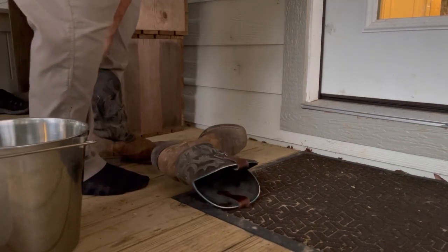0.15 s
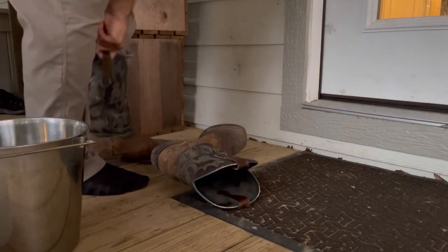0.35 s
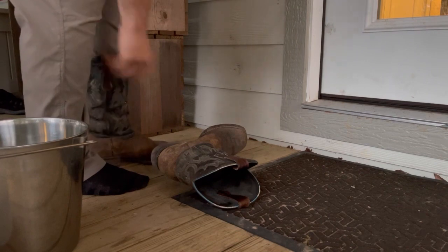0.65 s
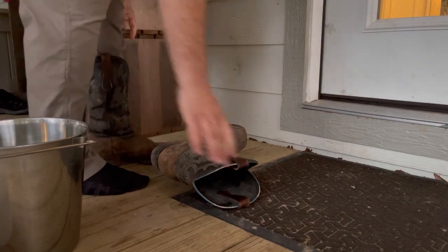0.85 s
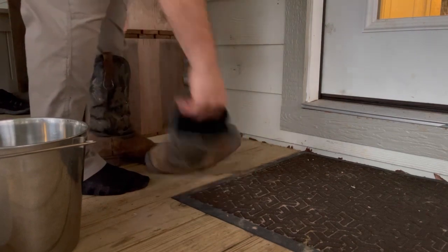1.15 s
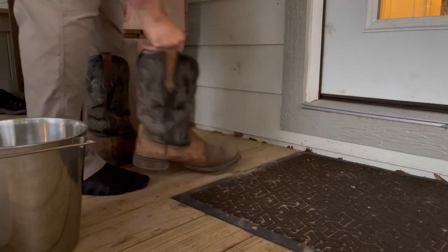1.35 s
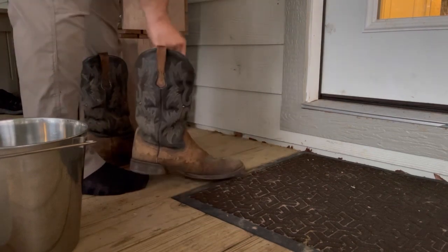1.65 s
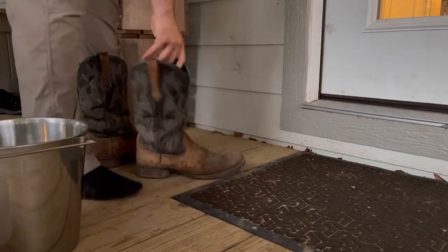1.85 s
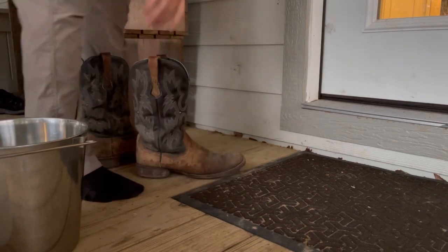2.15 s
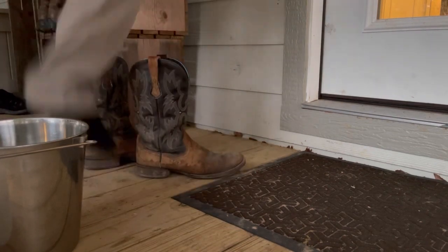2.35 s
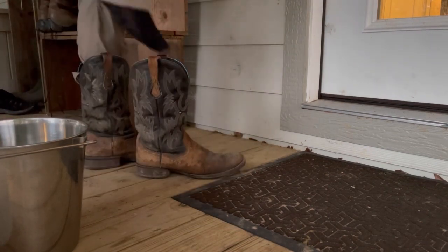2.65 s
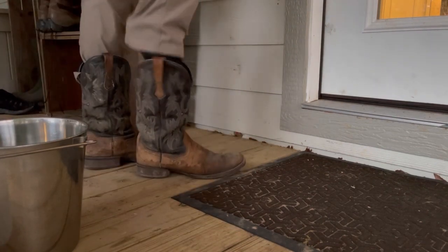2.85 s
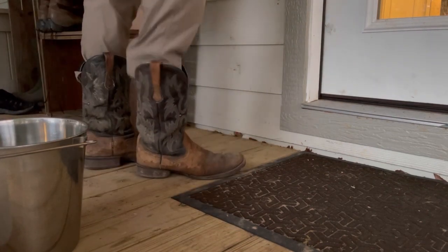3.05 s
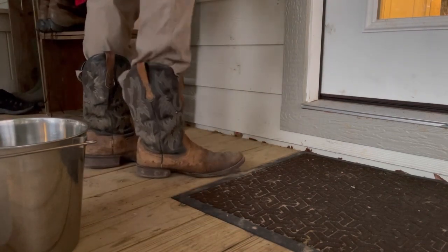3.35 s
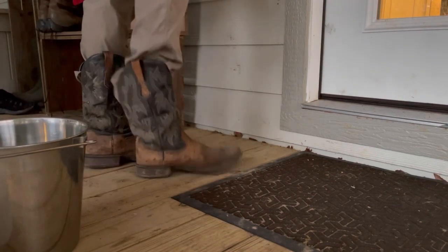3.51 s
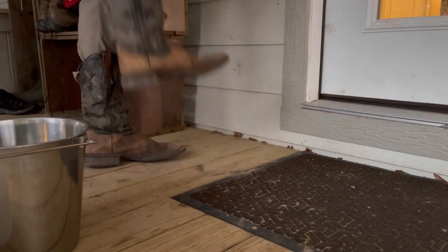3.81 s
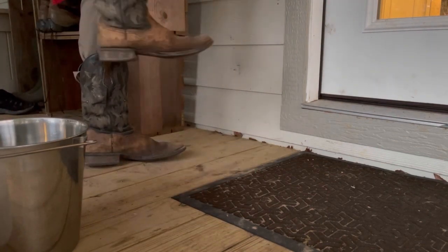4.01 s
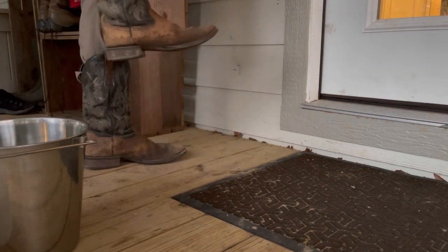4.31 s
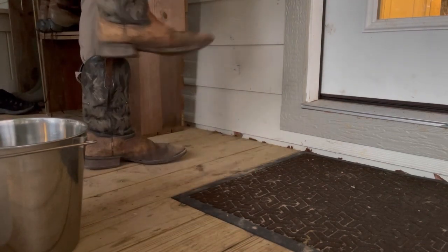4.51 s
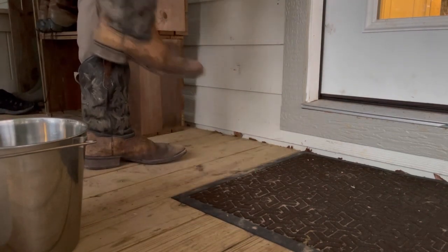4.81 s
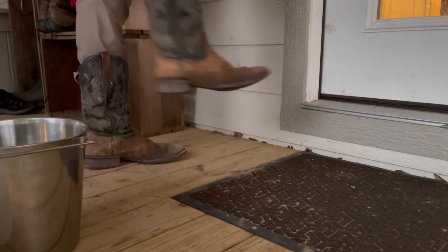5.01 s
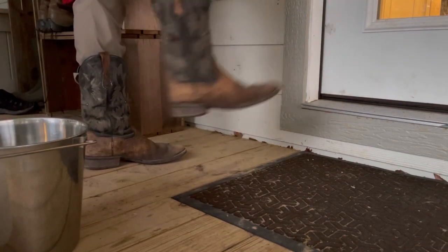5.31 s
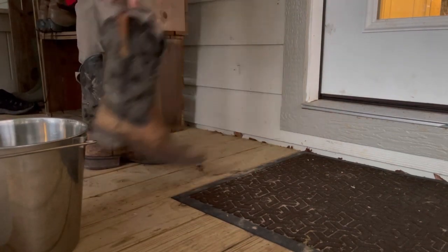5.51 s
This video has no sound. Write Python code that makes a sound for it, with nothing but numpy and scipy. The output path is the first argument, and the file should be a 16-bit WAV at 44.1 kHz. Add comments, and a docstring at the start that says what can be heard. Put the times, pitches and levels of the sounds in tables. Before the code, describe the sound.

Leather boots are pulled on over a wooden porch deck: cloth and leather rub, heels knock hollowly, ending with a whump and a stomp.

```python
"""Two leather boots are pulled on, on a wooden porch deck: sock and trouser leg rub through the hollow shafts.
The rubbing is coloured noise that swells stroke by stroke, with small leather slips and gliding hollow notes.
Heels knock on the boards and set them ringing, and the deck quivers; the second heel slides home with a whump.
Small scuffs, taps, bumps, pops and a squeak are short bursts of noise or fading tones.
A far bird calls three times and a faint whine comes and goes, over quiet outdoor air made of noise."""
import sys
import numpy as np
from scipy import signal
from scipy.io import wavfile
from scipy.ndimage import map_coordinates

SR = 44100
rng = np.random.default_rng(int(sys.argv[2]) if len(sys.argv) > 2 else 0)


def store_pcm(level_fs):
    """Save levels as 16-bit WAV."""
    pcm = np.round(np.clip(level_fs, -1, 1) * 32767).astype(np.int16)
    wavfile.write(sys.argv[1], SR, np.atleast_2d(pcm).T)


N = 249826
T = np.arange(N) / SR


def from_db(db):
    """Turn decibels into a gain."""
    return 10 ** (np.asarray(db) / 20)


def rms_one(x):
    """Scale a sound to an average strength (rms) of 1."""
    return x / np.sqrt(np.mean(x ** 2) + 1e-20)


def at_hz(points, hz, column=1):
    """Read one column of a table at a frequency, with frequency on a log scale."""
    points = np.array(points)
    return np.interp(np.log(hz), np.log(points[:, 0]), points[:, column])


def drift(rate_hz):
    """Smooth random wandering with an rms of 1; a higher rate wanders faster."""
    step = 40   # compute one point per 40 samples, then join them with straight lines
    r = np.exp(-2 * np.pi * rate_hz * step / SR)
    steps = rng.standard_normal(N // step + 2002)
    slow = signal.lfilter([1], [1, -2 * r, r * r], steps)[2000:]   # skip the filter's start-up
    return np.interp(np.arange(N) / step, np.arange(len(slow)), rms_one(slow))


def catching(rate_hz, depth_db):
    """An uneven gain, as when friction catches and lets go; rms 1."""
    return rms_one(from_db(depth_db * drift(rate_hz)))


def low_pass(x, hz, order=2):
    """Take away the treble above a frequency (Butterworth filter)."""
    return signal.sosfilt(signal.butter(order, hz, fs=SR, output="sos"), x + 1e-18)


def band_pass(x, low_hz, high_hz, order=2):
    """Keep only what lies between two frequencies (Butterworth filter)."""
    return signal.sosfilt(signal.butter(order, [low_hz, high_hz], "band", fs=SR, output="sos"), x)


def add(out, start_s, sound):
    """Mix a sound in from a given time on."""
    start = round(start_s * SR)
    out[..., start:start + sound.shape[-1]] += sound[..., :N - start]


def dying(t, t60_s):
    """Exponential fade that loses 60 dB in t60_s seconds."""
    return np.exp(-np.log(1000) * t / t60_s)


def ringing(modes, t, spread, scatter=1):
    """A struck body: a sum of fading tones, each with its own phase that differs between left and right."""
    sides = spread * np.array([[1], [-1]])
    out = 0
    for k, (hz, db, t60_s) in enumerate(modes):
        phase = scatter * k + sides * (-1) ** k * min(hz / 700, 1)
        out = out + from_db(db) * np.sin(2 * np.pi * hz * t + phase) * dying(t, t60_s)
    return out


# how alike left and right are: pitch_hz, likeness (1 = identical)
LIKENESS = [(60, 0.98), (250, 0.87), (500, 0.8), (1000, 0.62), (2000, .53), (4000, 0.42), (8000, 0.15),
            (13000, 0.2)]


def noise_bands(size):
    """Half-octave bands of stereo noise, as (Hz, band); the two sides are less alike in the treble."""
    edges_hz = 22 * 2 ** np.arange(0, 9.6, .5)
    white = rng.standard_normal((2, 2, size))
    for k, (low, high) in enumerate(zip(edges_hz, edges_hz[1:])):
        mid, side = band_pass(white[k % 2], low, high)
        hz = np.sqrt(low * high)
        alike = at_hz(LIKENESS, hz)
        yield hz, np.sqrt(1 + alike) * mid + np.sqrt(1 - alike) * side * [[1], [-1]]


def coloured(spectrum, patchy_db):
    """Stereo noise shaped to a spectrum, steeply falling beyond its ends; each band flickers; rms 1."""
    out, flicker = 0, from_db(patchy_db) - 1
    for hz, band in noise_bands(N):
        octaves_out = max(np.log2(spectrum[0][0] / hz), np.log2(hz / spectrum[-1][0]), 0)
        if octaves_out < 2:
            level = from_db(at_hz(spectrum, hz) - 22 * octaves_out)
            out = out + band * level * np.maximum(1 + flicker * drift(16), 0)
    return rms_one(out)


# air resonances inside a boot: pitch_hz, width_hz, level_db
CAVITY = [(314.4, 17, -2), (433.4, 13, 9), (543.5, 13, 11.5), (725, 32, 3), (1050, 240, -4),
          (1470, 120, 3.5)]


def hollow(x, share):
    """Part of a sound passes through the resonances of the boot's cavity; rms 1."""
    inside = sum(from_db(db) * signal.lfilter(*signal.iirpeak(hz, hz / width_hz, fs=SR), x)
                 for hz, width_hz, db in CAVITY)
    return rms_one((1 - share) * x + share * inside)


def wander(x, depth):
    """The shaft flexes: the sound is read faster and slower, so its resonances drift by a share of their pitch."""
    position = np.cumsum(1 + depth * drift(4)) % (N - 1)
    return np.array([map_coordinates(side, [position], order=3, mode="nearest") for side in x])


def slips(per_s, spread_db):
    """Leather grain sticks and slips: tiny snaps of uneven size in the creased hide; rms 1."""
    sizes = from_db(spread_db * np.minimum(rng.exponential(1, N), 3)) * rng.choice([-1, 1], N)
    happens = rng.random(N) < per_s / SR
    snaps = sizes * happens * (1 + 0.85 * rng.standard_normal((2, N)))
    return rms_one(band_pass(snaps + 1e-18, 900, 3200, order=1))


# strokes of cloth on leather, from the first foot going in to the last leg coming down:
# start_s, length_s, swell_db (rise during the stroke; negative sinks), hiss_db, shaft_tone_db, rasp_db
STROKES = [(0.085, 0.12, 8, -59, -57, -68), (0.195, 0.092, 2, -54.5, -45, -53),
           (0.308, 0.14, 1, -55.5, -48, -51), (0.418, 0.03, 1, -59, -49, -57),
           (0.549, 0.043, 0, -60, -49, -81), (1.048, 0.14, 9.5, -63.5, -48, -60.5),
           (1.443, 0.084, 7, -67.5, -50.5, -61), (2.217, 0.13, 0, -65.5, -62, -64.5),
           (2.347, 0.21, -3, -65.5, -75, -77), (2.717, 0.22, -7.5, -68.5, -64, -81),
           (2.982, 0.22, 0.5, -66, -58.5, -62.5), (3.123, 0.036, -5, -61, -46.5, -53.5),
           (3.19, 0.12, 4, -60.5, -70, -63), (3.213, 0.13, 18.5, -54.5, -49, -54),
           (3.38, 0.16, 0, -68, -59, -71), (3.592, 0.2, 9.5, -59.5, -72, -66.5),
           (3.795, 0.24, -2, -64, -66.5, -64.5), (4.116, 0.12, -2, -64, -71, -69.5),
           (4.321, 0.24, 3, -66, -59.5, -58), (4.492, 0.22, 18.5, -58.5, -53, -54),
           (4.719, 0.14, 3, -54, -51.5, -53), (4.878, 0.25, 7.5, -55.5, -54.5, -53.5),
           (5.066, 0.11, 17.5, -48, -45, -46.5), (5.348, 0.11, 9, -57, -52.5, -56.5),
           (5.474, 0.084, -5, -63, -80, -76)]
# clothes stir between strokes: hiss_db, shaft_tone_db, rasp_db
RUSTLE = [-70.5, -73, -71.5]
STROKE_ATTACK_S, STROKE_RELEASE_T60_S = 0.027, 0.38


def stroke_gains():
    """Gains of hiss, shaft tone and rasp: each stroke sets in, swells under pressure and dies away."""
    power = from_db(RUSTLE)[:, None] ** 2 * np.ones(N)
    t = T[:SR]
    attack = 1 - np.exp(-(t / STROKE_ATTACK_S) ** 2)
    for start_s, length_s, swell_db, *levels_db in STROKES:
        swell = from_db(swell_db * (np.minimum(t / length_s, 1) - 1))
        release = dying(np.maximum(t - length_s, 0), STROKE_RELEASE_T60_S)
        add(power, start_s, (from_db(levels_db)[:, None] * attack * swell * release) ** 2)
    return np.sqrt(power)


# colour of the cloth hiss: pitch_hz, level_db (per Hz)
HISS = [(900, -1), (1800, 0.5), (3000, -1.5), (5000, -3), (7000, -6), (10500, -8.5), (13500, -10.5)]
# colour of the hollow shaft tone: pitch_hz, level_db (per Hz)
SHAFT = [(130, -2), (240, -1), (340, -2), (450, -5), (580, -9.5), (760, -10), (950, -25.5)]
# colour of the leather rasp: pitch_hz, level_db (per Hz)
RASP = [(600, -28.5), (800, 3), (1050, -3), (1350, 2), (1650, -8), (2100, -5.5)]
FLEX = .045   # drift of the shaft's resonances, as a share of their pitch


def rubbing():
    """Cloth hisses on leather, the leather rasps and slips, and the hollow shaft colours the rubbing."""
    hiss_gain, shaft_gain, rasp_gain = stroke_gains()
    hiss = hiss_gain * from_db(2.5) * coloured(HISS, patchy_db=0.5)
    shaft_tone = wander(hollow(coloured(SHAFT, patchy_db=1.5), share=0.44), FLEX)
    sock_drag = catching(rate_hz=55, depth_db=2.5)   # the sock drags unevenly
    shaft = shaft_gain * shaft_tone * sock_drag
    grain = from_db(-9) * slips(per_s=260, spread_db=4)   # creasing leather
    rasp_tone = wander(hollow(coloured(RASP, patchy_db=1.5), share=0.63), FLEX)
    rasp = rasp_gain * (rasp_tone + grain)
    return (hiss + shaft + rasp) * catching(rate_hz=13, depth_db=1.5)


# hollow notes drawn from the boot by rubbing: start_s, length_s, first_pitch_hz, last_pitch_hz, level_db
HOLLOW_NOTES = [(.22, 0.082, 698, 868, -53), (0.352, .125, 1230, 1520, -54),
                (1.187, 0.057, 1070, 1047, -52.5), (1.48, 0.092, 460, 475, -60),
                (3.121, 0.036, 1176, 1296, -54.5), (3.194, 0.14, 394, 570, -55.5),
                (3.498, 0.079, 515, 565, -60.5)]
NOTE_ROUGHNESS_HZ = 60   # how fast the friction varies; it widens the note


def hollow_notes():
    """Friction excites one narrow air resonance, which glides as the cavity changes."""
    out = np.zeros(N)
    friction = drift(NOTE_ROUGHNESS_HZ) + 1j * drift(NOTE_ROUGHNESS_HZ)
    friction = friction / np.sqrt(np.abs(friction) ** 2 + 1)   # pressure evens out the strong moments
    for start_s, length_s, first_hz, last_hz, db in HOLLOW_NOTES:
        along = np.clip((T - start_s) / length_s, 0, 1)
        phase = 2 * np.pi * np.cumsum(first_hz + (last_hz - first_hz) * along) / SR
        note = rms_one(np.real(friction * np.exp(1j * phase)))
        swell = np.sqrt(np.abs(np.sin(np.pi * along)))
        out += from_db(db) * swell * note
    return out


# cloth flicks across leather: middle_s, half_width_s, level_db
SWISHES = [(0.031, 0.032, -63.5), (1.714, 0.037, -59), (2.26, 0.018, -51.5), (2.739, 0.0045, -55.5),
           (3.532, 0.017, -62), (4.175, 0.03, -62), (4.27, 0.036, -65.5), (5.445, 0.014, -73)]
# colour of the flicks: pitch_hz, level_db (per Hz)
SWISH = [(1800, -1), (3200, -2), (6000, 0), (10500, -2.5), (13500, -5)]


def swishes():
    """Cloth flicks across leather: a thin hiss that swells and fades."""
    gain = sum(from_db(db) * np.exp(-((T - middle_s) / half_width_s) ** 2)
               for middle_s, half_width_s, db in SWISHES)
    return gain * coloured(SWISH, patchy_db=2.5)


# the creased shaft pops as it is tugged: start_s, level_db, damping_t60_s
POPS = [(4.549, -48, .15), (4.684, -42, .03), (4.688, -36, 1), (5.047, -37, .05)]
# ring of the shaft's wall: pitch_hz, level_db, t60_s
SHAFT_WALL = [(754, 0, .15), (885, -13, .03), (1055, -12, .05), (1384, -12, .045), (1720, -11, .03),
              (2900, -14, .015)]


def pops():
    """The stiff shaft buckles with a short, woody note."""
    out, t = np.zeros((2, N)), T[:SR // 4]
    note = ringing(SHAFT_WALL, t, spread=0.33)
    for start_s, db, damping_t60_s in POPS:
        add(out, start_s, from_db(db) * note * dying(t, damping_t60_s))
    return out


# short squeak of stretched leather: middle_s, pitch_hz, half_width_s, level_db
SQUEAKS = [(4.642, 1090, 0.021, -52)]


def squeak(middle_s, hz, half_width_s, db):
    """The stretched leather sticks and slips in one short, rough note with a weak octave."""
    phase = 2 * np.pi * np.cumsum(hz * (1 + .045 * drift(200))) / SR
    note = np.sin(phase) + from_db(-12) * np.sin(2 * phase)
    rough = note * catching(rate_hz=150, depth_db=4)
    return from_db(db) * np.exp(-((T - middle_s) / half_width_s) ** 2) * rough


# the foot knocks inside a boot: start_s, level_db, damping_t60_s
BUMPS = [(0.5092, -31, 3), (2.751, -42, .14), (2.783, -40, .06), (2.906, -46, .1), (3.134, -41.5, .1),
         (3.180, -37.5, .06), (3.353, -39, .12)]
# ring of the boot: pitch_hz, level_db, t60_s
BOOT = [(208, -5, .17), (270, -5, .09), (335, -7, .1), (362, -6, .2), (411, -2, .24), (495, -5, .26),
        (555, -7, .1)]


def bumps():
    """The foot knocks inside a boot, which answers with a woody note; a foot that stays pressed on damps it."""
    out, t = np.zeros((2, N)), T[:SR // 2]
    note = ringing(BOOT, t, spread=0.5, scatter=0) * (1 - np.exp(-t / 0.0016))
    for start_s, db, damping_t60_s in BUMPS:
        add(out, start_s, from_db(db) * note * dying(t, damping_t60_s))
    return out


def heel_seats(start_s, start_hz, end_hz, fall_s, swell_s, db):
    """The heel drops into its cup and drives the air out: a whump that falls in pitch."""
    out, t = np.zeros(N), T[:SR // 4]
    pitch_hz = end_hz + (start_hz - end_hz) / (1 + t / fall_s)
    push = np.exp(-(np.log((t + 1e-6) / swell_s) / 0.42) ** 2) + 0.25 * dying(t, 0.11)
    add(out, start_s, from_db(db) * push * np.sin(2 * np.pi * np.cumsum(pitch_hz) / SR))
    return out


def cushion(x, hz):
    """A soft contact dulls the sound: two gentle low-passes in a row."""
    return low_pass(low_pass(x, hz, order=1), hz, order=1)


# boot on boards: start_s, knock_db, contact_cutoff_hz (lower = softer contact), thump_db
BLOWS = [(0.446, -30, 400, -38.5), (.505, -15, 276, -28), (1.046, -25, 160, -67), (1.108, -22, 135, -22.5),
         (1.188, -31, 600, -39), (1.344, -63, 201, -41), (1.463, -34, 900, -32.5), (1.525, -50, 700, -48),
         (1.788, -19.5, 900, -30), (1.8323, -1, 4000, -31), (2.803, -50, 400, -41), (2.904, -53, 670, -65),
         (3.326, -40, 600, -34.5), (5.207, -33, 393, -28), (5.245, -19.5, 192, -41),
         (5.616, -10.5, 3200, -22)]
# ring of the boards under a heel: pitch_hz, level_db, t60_s
BOARDS = [(72, -28, 0.55), (102, -41, 0.7), (132, -32, 0.28), (169, -35, 0.4), (205, -21, 0.33),
          (223, -26, 0.29), (264, -30, 0.32), (320, -21, 0.25), (342, -16, 0.22), (384, -24, 0.3),
          (437, -15, 0.16), (467, -10.5, 0.24), (484, -19, 0.29), (512, -13.5, 0.25), (569, -27, 0.23),
          (594, -14, 0.11), (674, -36, 0.32), (737, -17, 0.05), (784, -16, 0.13), (808, -25, 0.24),
          (834, -36, 0.35), (871, -28, 0.26), (985, -30, 0.11), (1070, -30, 0.08), (1285, -41, 0.15),
          (1392, -42, 0.07), (1540, -34, 0.04), (1800, -39, 0.04), (1980, -40, 0.05), (2700, -44, 0.02)]
# clack of the hard heel block itself: pitch_hz, level_db, t60_s
HEEL_BLOCK = [(690, -14, 0.011), (1020, -18.5, 0.014)]
# slow bending of the whole deck: pitch_hz, level_db, t60_s
JOISTS = [(46.3, -21, 0.27), (65.7, -7, 0.08), (86.6, 10.5, 0.083), (113.7, -10, 0.34), (120.3, 4.5, 0.082)]
# dense after-ring of deck and porch: pitch_hz, level_db (per Hz), t60_s
AFTER_RING = [(60, 13, 0.21), (150, 3, 0.49), (300, -0.5, 0.92), (497, 6, 0.39), (848, -5.5, 0.46),
              (1160, -12, 0.29), (2240, -18, 0.17), (4950, -16.5, 0.2), (12000, -21.5, 0.13)]
THUMP_LAG_S = .007   # the weight arrives just after the contact


def heels():
    """Each blow cracks and rings the boards, duller when the contact is soft; its weight bends the deck."""
    out, t = np.zeros((2, N)), T[:SR]
    onset = 1 - np.exp(-(t / .0003) ** 2)
    boards = from_db(1) * ringing(BOARDS, t, spread=.35) * onset
    block = ringing(HEEL_BLOCK, t, spread=.3, scatter=0) * onset
    thump = low_pass(ringing(JOISTS, t, spread=0.51), hz=177, order=3)
    # grit crushed under the heel in the first milliseconds
    grit = band_pass(rng.standard_normal(SR), 1100, 2400)
    crack = from_db(-36) * rms_one(grit) * dying(t, .022)
    # the blow spreads through neighbouring boards and returns from the house wall
    after = 0
    for hz, band in noise_bands(SR):
        after = after + band * from_db(at_hz(AFTER_RING, hz)) * dying(t, at_hz(AFTER_RING, hz, column=2))
    after = from_db(-41.5) * rms_one(after * (1 - np.exp(-t / 0.012)))
    knock = crack + block + boards + after
    for start_s, knock_db, contact_hz, thump_db in BLOWS:
        add(out, start_s, from_db(knock_db) * cushion(knock, contact_hz))
        add(out, start_s + THUMP_LAG_S, from_db(thump_db) * thump)
    return out


# level relative to the thump
SWAY_DB, SWAY_ATTACK_S, SWAY_T60_S = -12.5, 0.0036, 0.88


def deck_sway():
    """Every thump leaves the deck quivering: a low rumble that builds up quickly and dies slowly."""
    power = np.zeros(N)
    quiver = (1 - np.exp(-T / SWAY_ATTACK_S)) * dying(T, SWAY_T60_S)
    for start_s, _, _, thump_db in BLOWS:
        add(power, start_s + THUMP_LAG_S, (from_db(thump_db + SWAY_DB) * quiver) ** 2)
    # rumble colour: pitch_hz, level_db (per Hz)
    rumble = coloured([(40, -9), (62, 0.0), (80, 3.0), (110, -8.5), (160, -16.5)], patchy_db=0.5)
    return np.sqrt(power) * rumble


# short scuffs of sole and shaft: start_s, bright_db, dull_db, t60_s
SCUFFS = [(0.445, -60, -44, 0.09), (1.202, -54, -39.5, 0.15), (1.46, -36.5, -32, 0.059),
          (1.481, -41.5, -39, 0.048), (1.783, -40.5, -36.5, 0.24), (1.833, -47, -25, 0.015),
          (2.904, -60, -39, 0.017), (3.335, -45, -43, 0.14), (4.055, -48.5, -58, 0.092),
          (4.421, -52, -39, 0.04), (4.778, -60, -41, 0.036), (5.046, -56, -51, 0.034),
          (5.2, -50, -23, 0.055), (5.616, -42.5, -23, 0.05)]
# colour of the bright part: pitch_hz, level_db (per Hz)
SOLE_BRIGHT = [(1500, -4), (2800, -7), (4500, -2.5), (6300, -0.5), (8500, -7), (13500, -7)]
# colour of the dull part: pitch_hz, level_db (per Hz)
SOLE_DULL = [(300, 7), (550, -15), (800, -10.5), (1030, -8.5), (1400, -6), (2400, -15)]
SOLE_HZ, SOLE_Q = 1030, 10   # main resonance of a scraped sole, and its sharpness


def scuffs():
    """A sole or shaft grazes something: a gritty burst that dies quickly, coloured by the stiff sole."""
    bright, dull, t = np.zeros(N), np.zeros(N), T[:SR // 2]
    for start_s, bright_db, dull_db, t60_s in SCUFFS:
        stroke = dying(t, t60_s) * (1 - np.exp(-t / (0.12 * t60_s)))   # long scuffs also start more softly
        add(bright, start_s, from_db(bright_db) * stroke)
        add(dull, start_s, from_db(dull_db) * stroke)
    sole = coloured(SOLE_DULL, patchy_db=.5)
    clack = signal.lfilter(*signal.iirpeak(SOLE_HZ, SOLE_Q, fs=SR), sole)
    dull_noise = rms_one(sole + from_db(15) * clack)
    return bright * coloured(SOLE_BRIGHT, patchy_db=2.0) + dull * dull_noise


# the stiff sole is tapped or snaps as it flexes: start_s, level_db
TAPS = [(1.461, -35.5), (1.484, -39), (1.789, -33), (2.905, -59), (4.056, -39.5), (4.424, -52),
        (5.2011, -36)]
# ring of the sole: pitch_hz, level_db, t60_s
SOLE = [(746, -10, 0.046), (998, -4.5, 0.039), (1140, -23, 0.031), (1450, -20.5, 0.027),
        (2670, -22.5, 0.0075)]


def taps():
    """Small dry clacks of the sole, made of quickly fading tones."""
    out, clack = np.zeros((2, N)), ringing(SOLE, T[:SR // 4], spread=.45)
    for start_s, db in TAPS:
        add(out, start_s, from_db(db) * clack)
    return out


# far bird calls: start_s, level_db
CALLS = [(4.345, -55), (4.755, -52), (5.245, -55)]
# shape of one call: time_into_call_s, pitch_hz, level_db
CALL_SHAPE = [(0, 1200, -20), (.018, 1270, -3), (0.042, 1480, -3), (0.065, 1540, 0), (0.088, 1450, -1),
              (0.108, 1330, 0), (.135, 1230, 1), (.175, 1130, -16)]
HOARSE = .04   # random wobble, as a share of the pitch
YARD_DB, YARD_T60_S = -6, .35   # echoes relative to the direct call


def bird():
    """A far, hoarse call that arches up and down, three times, blurred by echoes from the yard."""
    out, t = np.zeros((2, N)), T[:SR // 5]
    at_s, pitch_hz, shape_db = np.transpose(CALL_SHAPE)
    echoes = rng.standard_normal((2, len(t))) * dying(t, YARD_T60_S)
    yard = from_db(YARD_DB) * echoes / np.sqrt(np.sum(echoes[0] ** 2))
    yard[:, 0] += 1   # the direct call
    for start_s, db in CALLS:
        hz = np.interp(t, at_s, pitch_hz) * (1 + HOARSE * drift(260)[:len(t)])
        level = from_db(db + np.interp(t, at_s, shape_db))
        call = level * np.sin(2 * np.pi * np.cumsum(hz) / SR)
        flutter = catching(rate_hz=90, depth_db=3.5)[:len(t)]
        add(out, start_s, signal.fftconvolve((call * flutter)[None], yard, axes=1))
    return out


# partials of the far whine: pitch_hz, level_db
WHINE = [(1150, -63), (2130, -73.5), (4380, -76.5)]
WHINE_MIDDLE_S, WHINE_HALF_WIDTH_S, WHINE_WAVER_HZ = 1.47, .3, 70


def whine():
    """A faint, far whine of a few wavering partials comes and goes."""
    partials = 0
    for hz, db in WHINE:
        wavering_hz = hz + WHINE_WAVER_HZ * drift(120)
        partials = partials + from_db(db) * np.sin(2 * np.pi * np.cumsum(wavering_hz) / SR)
    return partials * np.exp(-((T - WHINE_MIDDLE_S) / WHINE_HALF_WIDTH_S) ** 4)


# colour of the outdoor air: pitch_hz, level_db (per Hz)
AIR = [(25, -5.5), (54, 6.5), (81, 8.5), (143, -0.5), (264, -18.5), (444, -29.5), (678, -3), (950, -17),
       (1300, -7.5), (2000, -37.5), (4400, -20), (7000, -52.5)]


def outdoor_air():
    """Quiet outdoor air: steady coloured noise whose bands flicker."""
    return from_db(-57.5) * coloured(AIR, patchy_db=3)


def scene():
    """Boots close by, over the swaying deck and the outdoor air."""
    rub = rubbing() * from_db([[.5], [-.5]])   # slightly to the left
    leather = hollow_notes() + swishes() + pops() + sum(squeak(*row) for row in SQUEAKS)
    whump = heel_seats(start_s=5.202, start_hz=885, end_hz=33.5, fall_s=0.00158, swell_s=0.018, db=-14.5)
    boots = rub + leather + bumps() + whump + heels() + scuffs() + taps()
    return boots + deck_sway() + bird() + whine() + outdoor_air()


def record(dry):
    """The microphone loses the deepest bass (below 38 Hz); the top is cut above 13500 Hz."""
    lean = signal.sosfilt(signal.butter(3, 38, "high", fs=SR, output="sos"), dry)
    return signal.sosfilt(signal.ellip(10, .1, 80, 13500, fs=SR, output="sos"), lean)


dry = scene()
out = record(dry)
store_pcm(out)
```